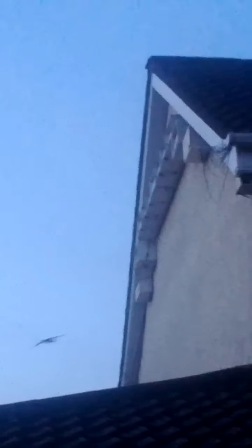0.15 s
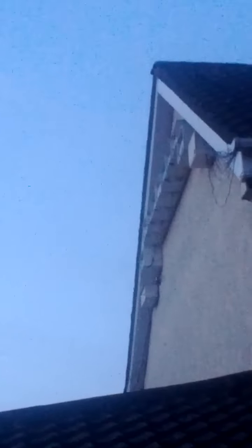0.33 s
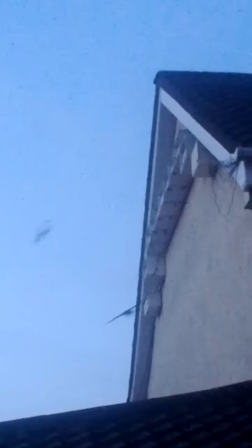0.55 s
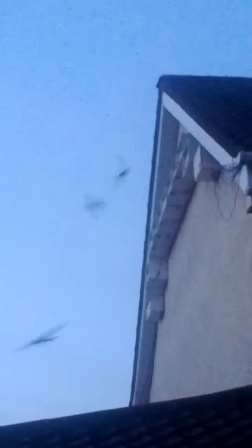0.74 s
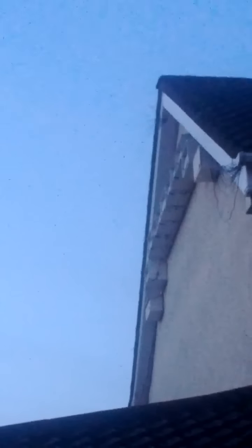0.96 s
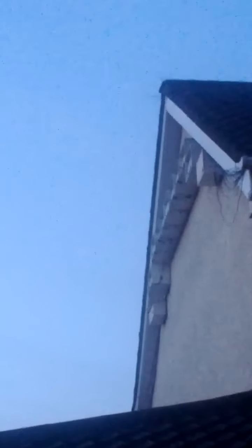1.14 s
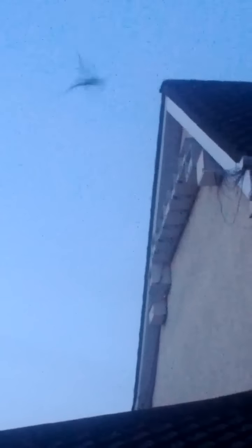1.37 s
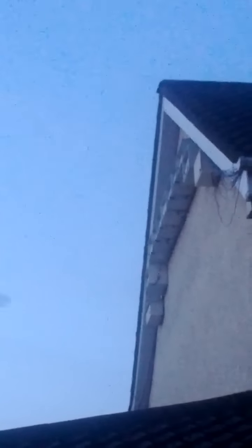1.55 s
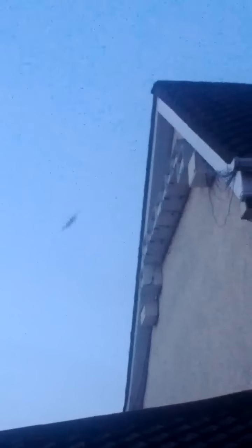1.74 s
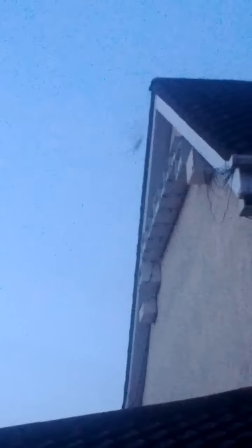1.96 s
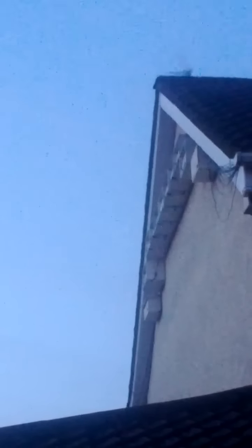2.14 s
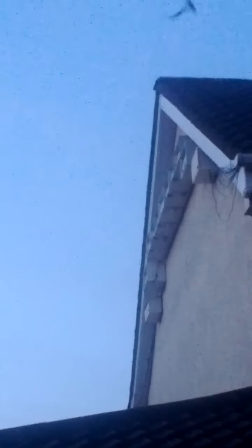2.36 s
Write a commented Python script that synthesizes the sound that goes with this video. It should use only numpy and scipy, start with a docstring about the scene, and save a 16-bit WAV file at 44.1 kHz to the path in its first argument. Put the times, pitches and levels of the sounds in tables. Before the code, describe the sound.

Shrill, raspy screams and short pips from fast-flying swifts over a faint outdoor hush.

```python
"""Shrill, trilling screams open the scene: a party of swifts racing round a house roof in the evening.
Each is a whistle from the syrinx, modulated in pitch and amplitude; most swoop up, break into a fast
trill and sag, and many end in a stutter of short pips. Period doubling gives the voice its rasp.
The walls reflect the calls; behind them lie a distant traffic hush and a little wind on the microphone."""
import sys
import numpy as np
from scipy import signal
from scipy.fft import rfft, irfft
from scipy.io import wavfile
from scipy.ndimage import uniform_filter1d

SR = 44100
rng = np.random.default_rng(int(sys.argv[2]) if len(sys.argv) > 2 else 0)


def wav_record(signal):
    """Record a signal, one row per channel, as 16-bit PCM in the file named by sys.argv[1]."""
    frames = np.transpose(np.atleast_2d(signal))
    bounded = np.clip(frames, -1, 1)
    # unit amplitude maps onto the largest positive 16-bit level
    quanta = np.round(bounded * 32767).astype(np.int16)
    wavfile.write(sys.argv[1], SR, quanta)


N = 105840
T = np.arange(N) / SR
STEADY_AIR = 0.04   # share of the air noise left while the whistle is steady


def from_db(db):
    """The decibel scale: level to amplitude ratio."""
    return 10 ** (np.asarray(db) / 20)


def coloured(spectrum):
    """Spectral shaping: noise of rms 1 that follows a spectrum and rolls off past its last point."""
    hz, db = np.transpose(spectrum)
    log_f = np.log(np.maximum(np.arange(N // 2 + 1) * SR / N, 1))
    roll_off = np.exp(-10 * np.maximum(log_f - np.log(hz[-1]), 0))
    gain = from_db(np.interp(log_f, np.log(hz), db)) * roll_off
    noise = irfft(rfft(rng.standard_normal(N)) * gain, N)
    return noise / noise.std()


def drift(rate_hz):
    """Low-pass filtered noise: a smooth random fluctuation of standard deviation 1."""
    pole = np.exp(-2 * np.pi * rate_hz / SR)
    noise = signal.lfilter([1], [1, -2 * pole, pole * pole], rng.standard_normal(N // 2))
    return noise[::-1] / noise.std()


def piece(noise, n):
    """Decorrelation by time shift: a random stretch of n samples."""
    return noise[int(rng.random() * len(noise) / 2):][:n]


def add(out, start, sound):
    """Superposition: a sound joins the mix at its start time."""
    i = max(int(start * SR), 0)
    out[i:i + len(sound)] += sound[:max(N - i, 0)]


def gate(t, length, attack_s, release_s):
    """An amplitude envelope with quarter-sine attack and release."""
    rise = np.sin(np.pi / 2 * np.clip(t / attack_s, 0, 1))
    fall = np.sin(np.pi / 2 * np.clip((length - t) / release_s, 0, 1))
    return rise * fall


def air_noise():
    """Broadband noise of the air in the voice, strongest near 6 and 12 kHz."""
    # (frequency [Hz], level [dB])
    air_spectrum = [(2500, -26), (4000, -23), (5500, -3.5), (6800, -4), (8000, -6), (9800, -14),
                    (12000, -1.5), (14000, -8.5), (16000, -36)]
    return coloured(air_spectrum)


def syrinx(hz, octave_db, rasp, flutter_rad, air):
    """Self-sustained oscillation: three harmonics, half-order tones from period doubling, and air noise."""
    n = len(hz)
    jitter_hz, wander_hz = 27.3, 131   # the doubling is unsteady, so its spectral lines are broad
    phase = 2 * np.pi * np.cumsum(hz + jitter_hz * drift(223)[:n]) / SR
    half = phase / 2 + 2 * np.pi * np.cumsum(wander_hz * drift(220)[:n]) / SR
    grain = flutter_rad * drift(230)[:n]
    overtones = np.sin(2 * phase + grain) + from_db(-5) * np.sin(3 * phase + 2 * grain)
    whistle = np.sin(phase) + from_db(octave_db) * overtones
    # 1.5, 2.5 and 0.5 times the pitch
    halves = np.sin(half + phase) + from_db(-3.5) * np.sin(half + 2 * phase) + from_db(-19) * np.sin(half)
    return np.sqrt(2) * (whistle + rasp * halves) + from_db(-10.5) * air


def screams(hiss):
    """Amplitude and frequency modulation make a whistle trill; gives direct and wall-bound sound."""
    # (trill rate [Hz], octave [dB], rasp [dB], rasp peak time [s], echo [dB], course)
    # course: (time [s], pitch [Hz], level [dB], trill depth [0-1])
    calls = [ (274, -12.5, -25, 0.14, -7.5, [(.07, 6620, -34, 0.74), (.14, 6476, -34, 0.71),
             (.23, 6410, -36, .75), (.335, 6040, -37.5, 1)]),
             (270, -9.5, -16, 0.23, -10, [(.08, 4800, -55, 0.6), (.16, 5640, -42.5, 0.5),
             (.21, 5990, -38, 0.83), (.29, 6100, -45, 0.9)]),
             (259, -9, -10, 0.556, -10.5, [(.472, 4660, -47, 0), (.49, 5500, -29, .2),
             (.512, 5750, -30.5, 0.5), (.548, 5990, -25.5, 0.31), (.58, 6128, -29.5, 0.3),
             (.635, 6245, -26, 0.15), (.685, 6190, -33, 1), (.73, 6084, -34, 1), (.765, 5920, -35, 0.94)]),
             (262, -14, -44, 0.54, -19, [(.497, 4610, -41.5, 0), (.52, 5120, -40.5, 0.2),
             (.56, 5540, -35, 0.3), (.63, 5754, -33.5, .15), (.7, 5830, -30, 0.5), (.76, 5520, -37, 0.7)]),
             (248, -13, -10, .68, -19, [(.641, 4450, -59, .1), (.68, 5270, -55, 0.4),
             (.76, 5600, -56, 0.3)]), (255.5, -12, -14.5, 0.955, -7.5, [(.896, 4670, -37.5, 0.2),
             (.91, 5490, -28, .3), (.937, 5964, -30, 0.25), (.988, 6134, -25, 0.27),
             (1.04, 5945, -33, 0.46), (1.14, 5760, -36, 0.97)]),
             (260, -7, -32, 1.02, -9, [(.979, 4240, -47, .15), (.995, 4950, -38, .15),
             (1.03, 5250, -38, .15), (1.1, 5380, -40, 0.46), (1.17, 5300, -50, 0.5)]),
             (241, -11.5, -10.5, 1.248, -5, [(1.177, 4750, -43, 0.4), (1.197, 5470, -26, 0.4),
             (1.228, 5764, -30, 0.25), (1.252, 5855, -23, 0), (1.275, 5900, -30.5, 0.57),
             (1.318, 5925, -30.5, 0.44), (1.35, 5875, -40, 0.95), (1.385, 5960, -31.5, 0.67),
             (1.42, 5830, -43, 0.7)]), (224.4, -6, -28, 1.48, -4.5, [(1.335, 5970, -45, .9),
             (1.42, 6250, -41.5, 0.86), (1.5, 6030, -42.5, 1), (1.575, 5753, -45, 0.8)]),
             (268.7, -15, -19, 1.72, -9, [(1.671, 4040, -43.5, 0.04), (1.683, 4500, -43.5, 0),
             (1.7, 4360, -46, 0.4), (1.725, 4800, -38.5, 0.17), (1.77, 4976, -43, 0.7),
             (1.82, 5000, -43, 1)]), (268, -9, -34, 1.8, -1.5, [(1.675, 4670, -45, 0),
             (1.73, 5590, -49.5, 0.6), (1.81, 6140, -53, 1), (1.98, 5930, -54.5, 1)]),
             (285, -16, -36, 2.05, -3.5, [(1.971, 4400, -55.5, 0.8), (2.05, 5186, -47, 0.8),
             (2.19, 5300, -50.5, 1)]), (258, -5.5, -9, 2.1, -12, [(2.001, 5120, -47, 0),
             (2.016, 5710, -41.5, .35), (2.052, 5870, -39.5, 0.37), (2.1, 6180, -40.5, 0.23),
             (2.14, 5840, -46, 0.5), (2.18, 5750, -52, 1)]),
             (281.6, -8, -34, 2.2, -7, [(2.08, 6340, -50, 1), (2.17, 6580, -49, 1),
             (2.36, 6520, -50.5, 1)]), (230, -11, -35, 2.25, -8, [(2.15, 5850, -47, 0.96),
             (2.4, 5580, -54.5, 0.63)])]
    slowing, unevenness = 0.1025, 0.0354   # shares of the trill rate
    swing_hz, slip_hz, glide_s = 246, 109, 0.0093
    pitch_lead_rad, flare_lead_rad = 1.53, 0.98   # pitch and overtones peak ahead of each pulse
    rattle_hz, shimmer_db, rasp_width_s = 97.1, 0.88, 0.038
    direct, to_walls = np.zeros((2, N))
    for trill_hz, octave_db, rasp_db, rasp_s, echo_db, course in calls:
        times, *controls = np.transpose(course)
        start, length = times[0], times[-1] - times[0]
        n = int(length * SR)
        t = T[:n]
        progress = t / length
        hz, db, depth = (np.interp(start + t, times, control) for control in controls)
        rate = trill_hz * (1 - slowing * progress + unevenness * drift(40.6)[:n])
        trill = 2 * np.pi * np.cumsum(rate) / SR
        crest = (1 + np.cos(trill)) / 2   # 1 on a pulse, 0 in the dip between pulses
        hz = uniform_filter1d(hz, int(glide_s * SR))   # the pitch rounds off its turns
        hz += swing_hz * depth * np.cos(trill + pitch_lead_rad)
        hz += slip_hz * depth ** 2 * (1 - crest) * drift(350)[:n]
        pulses = (1 + depth * np.cos(trill)) / np.sqrt(1 + depth ** 2 / 2)   # constant mean power
        # a dying trill breaks into strong and weak pulses
        rattle_db = 3 * depth * progress * np.cos(2 * np.pi * rattle_hz * t)
        level = from_db(db + rattle_db + shimmer_db * drift(90)[:n])
        rasp = from_db(rasp_db) * crest / (1 + ((start + t - rasp_s) / rasp_width_s) ** 2)
        flare_db = 0.5 * (np.cos(trill + flare_lead_rad) - .5)
        air = piece(hiss, n) * (STEADY_AIR + (1 - STEADY_AIR) * depth)
        voice = syrinx(hz, octave_db + flare_db, rasp, flutter_rad=0.9, air=air)
        call = gate(t, length, attack_s=0.0044, release_s=0.016) * level * pulses * voice
        add(direct, start, call)
        add(to_walls, start, from_db(echo_db) * call)
    return direct, to_walls


def distant_hush():
    """Stationary noise: the low hush of distant traffic and wind, with a faint high hiss."""
    # spectra of the hush and of the hiss: (frequency [Hz], level [dB])
    hush_spectrum = [(15, -43), (25, -1), (70, -0.5), (155, -7), (185, -11.5), (307, -12), (403, -14.5),
                     (479, -12.5), (984, -8), (1150, -10), (1570, -20.5), (2230, -26.5), (2600, -30),
                     (3380, -40), (5720, -120)]
    hiss_spectrum = [(1500, -21), (2600, -0.5), (4000, 10), (8000, 5.5), (16000, 7.5)]
    return from_db(-50) * coloured(hush_spectrum) + from_db(-60) * coloured(hiss_spectrum)


def street_echo(sound):
    """Convolution with the street's impulse response: early reflections and a diffuse, decaying tail."""
    # wall reflections: (delay [s], level [dB])
    reflections = [(.0052, -6.5), (0.0143, -5.5), (.029, -6.5)]
    # spectrum of the reverberation: (frequency [Hz], level [dB])
    tail_spectrum = [(3000, 0.5), (6000, 0), (12000, -4), (16000, 5.5)]
    t60_s, build_up_s, tail_db = 0.65, 0.0071, -1.5
    response = coloured(tail_spectrum) * from_db(-60 * T / t60_s) * np.clip(T / build_up_s, 0, 1)
    response *= from_db(tail_db) / np.sqrt(np.sum(response ** 2))
    for delay, db in reflections:
        add(response, delay, from_db([db]))
    return signal.fftconvolve(sound, response)[:N]


def pips(hiss):
    """Brief linear chirps of the voice, the low ones steep and scratchy; direct and wall-bound sound."""
    # (time [s], length [s], pitch [Hz], glide [Hz], level [dB], octave [dB], rasp [dB])
    notes = [ (0.09, 0.0068, 4020, -1200, -48, -2, -30), (0.344, 0.0056, 6090, -200, -28.5, -9, -16.5),
             (0.356, 0.0026, 6120, -200, -22, -8, -23), (0.366, 0.0054, 6004, -200, -26.5, -7, -26),
             (0.377, 0.007, 6035, -200, -26.5, -8.5, -19.5), (0.39, 0.0061, 5800, -250, -27.5, -9, -33),
             (0.405, 0.0028, 5500, -300, -26, -6, -11), (0.418, 0.0039, 5470, -300, -30, -6.5, -21),
             (0.427, 0.004, 5330, -600, -33, -8, -33), (0.444, 0.003, 5130, -700, -31, -8, -47),
             (.457, 0.0056, 4750, -700, -39, -15, -24), (0.743, 0.0083, 5560, 9, -28, -7, -15),
             (0.767, 0.0093, 5610, 2, -32.5, -0.5, -12), (.794, 0.0072, 5680, -100, -25.5, -7, -27),
             (0.7954, 0.0074, 6000, 200, -33, -1, -12), (0.817, 0.008, 5510, -100, -30, -1, -12),
             (0.8194, 0.0082, 6126, 204, -29.5, -3, -11), (0.842, 0.0044, 5180, -700, -37, -1, -5),
             (0.847, 0.0093, 6044, 100, -30.5, -5, -10.5), (0.865, 0.0073, 3860, -1400, -48.5, 2, -25),
             (0.8749, 0.0059, 5980, 110, -28, -5.5, -13), (0.932, 0.0018, 4000, -1200, -34, -12, -18),
             (1.128, 0.012, 3850, -900, -49.5, 7, -7), (1.1415, 0.0064, 5810, 0, -26.5, -10, -20),
             (1.1496, 0.013, 5880, -100, -30, -7.5, -23), (1.164, 0.0087, 5710, -200, -26, -13, -30),
             (1.167, 0.011, 3910, -900, -51.5, 9, -18), (1.177, 0.012, 5710, -200, -30, -11, -18),
             (1.215, 0.0035, 4230, -900, -37, -8, -17), (1.234, 0.005, 5070, -500, -29.5, -12, -30),
             (1.25, 0.0051, 4890, -600, -33, -24, -13), (1.261, 0.0047, 4350, -1100, -35, -7, -5),
             (1.283, 0.0073, 4160, -800, -40.5, 0, -10), (1.315, 0.0039, 4250, -700, -42, -6, -19),
             (1.3349, 0.0023, 3730, -900, -38, 9, -24), (1.335, 0.0048, 5860, 0, -21.5, -26, -35),
             (1.437, 0.013, 5990, 103, -38.5, -2.5, -6), (1.467, 0.0073, 5913, -3, -26.5, -10, -15.5),
             (1.487, 0.02, 6040, -25, -35, -7.5, -14), (1.519, 0.016, 5880, -2, -39, -5.5, -14),
             (1.554, 0.0069, 5650, -9, -40, -5, -14), (1.578, 0.0076, 4000, -900, -50, -1, -19),
             (1.744, 0.0077, 3840, -700, -44.5, -1.5, -19), (1.763, 0.0064, 3650, -600, -50, 4, -18),
             (1.838, 0.0067, 3964, -600, -40, -3.5, -29), (1.86, .011, 5280, 103, -34, -6.5, -26),
             (1.886, 0.012, 5265, 58, -33, -8.5, -22), (1.909, 0.007, 4220, -1000, -35.5, -17, -17),
             (1.932, 0.0082, 3860, -800, -43, -2.5, -32), (2.197, 0.003, 5300, -300, -39.5, -1, -29),
             (2.212, 0.0068, 5560, -300, -43, -3, -24), (2.227, 0.0085, 5190, -400, -39, -17, -25),
             (2.238, 0.011, 5120, -400, -42.5, -18, -27), (2.251, 0.01, 5190, -500, -44, -10, -23),
             (2.267, 0.006, 5030, -400, -42, -12, -24), (2.28, 0.0071, 4860, -500, -41.5, -23, -24),
             (2.31, 0.0068, 4590, -500, -41.5, -25, -24), (2.326, 0.0065, 5340, -200, -40, -16, -31),
             (2.336, 0.0037, 6270, 0, -35.5, -8.5, -28), (2.363, 0.0063, 6800, 107, -40.5, -1, -26),
             (2.3935, 0.0084, 6700, 16, -49, 7, -19)]
    near_db = -26   # weaker pips come from farther off, so more of their sound is echo
    direct, to_walls = np.zeros((2, N))
    wobble = drift(960)
    for start, length, hz, glide_hz, db, octave_db, rasp_db in notes:
        n = int(length * SR)
        t = T[:n]
        wobble_hz = 76.5 + 0.096 * abs(glide_hz)
        pitch = hz + glide_hz * (t / length - .5) + wobble_hz * piece(wobble, n)
        air = STEADY_AIR * piece(hiss, n)
        voice = syrinx(pitch, octave_db, from_db(rasp_db), flutter_rad=0.14, air=air)
        pip = from_db(db) * gate(t, length, attack_s=.0016, release_s=.0032) * voice
        echo_db = -8.5 + 0.28 * max(near_db - db, 0)
        add(direct, start, pip)
        add(to_walls, start, from_db(echo_db) * pip)
    return direct, to_walls


def wind_puffs():
    """Pressure fluctuations of wind on the microphone: low noise under Gaussian envelopes."""
    # (time [s], width [s], level [dB])
    puffs = [(0.124, 0.022, -39.5), (.43, 0.022, -52), (0.934, 0.016, -39)]
    # (frequency [Hz], level [dB])
    puff_spectrum = [(15, 4.5), (35, 3.5), (75, -1.5), (130, -21), (400, -63), (2000, -90)]
    gusts = sum(from_db(db) * np.exp(-.5 * ((T - peak) / width) ** 2) for peak, width, db in puffs)
    return gusts * coloured(puff_spectrum)


def scene():
    """Superposition of the birds' direct sound, their echoes and the evening background."""
    background = distant_hush() + wind_puffs()
    hiss = air_noise()
    direct, to_walls = np.add(screams(hiss), pips(hiss))
    return (direct + street_echo(to_walls) + background)[None]


def record(dry):
    """Gating and band limiting: the sound starts abruptly, and a steep low-pass cuts the top treble."""
    start_s, rise_s, cutoff_hz = .0785, .001, 15700
    onset = np.clip((T - start_s) / rise_s, 0, 1)
    low_pass = signal.ellip(10, .2, 80, cutoff_hz, fs=SR, output="sos")
    return signal.sosfilt(low_pass, dry * onset)


dry = scene()
out = record(dry)
wav_record(out)
```